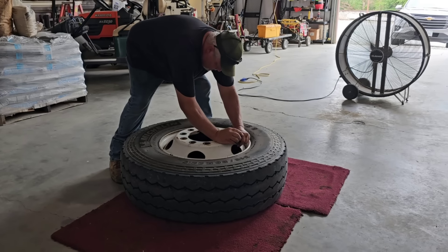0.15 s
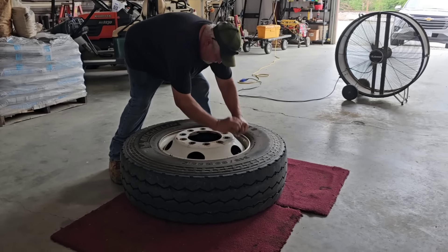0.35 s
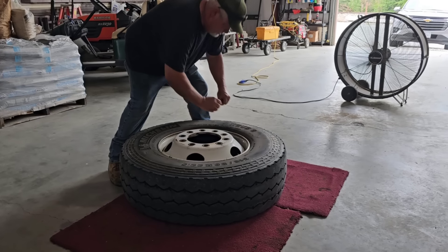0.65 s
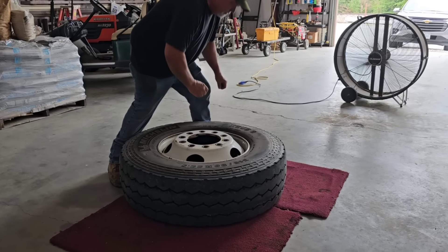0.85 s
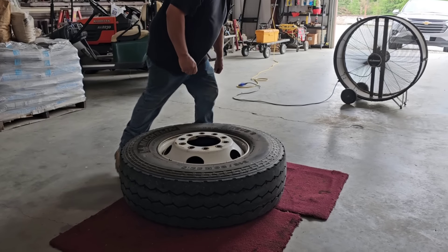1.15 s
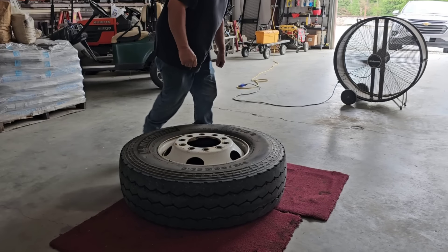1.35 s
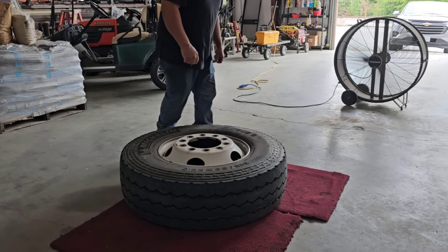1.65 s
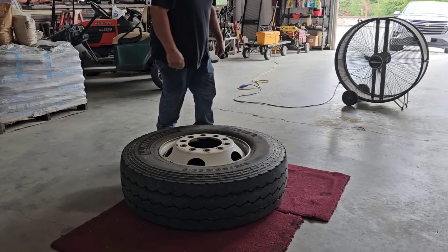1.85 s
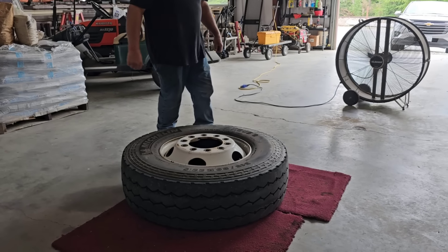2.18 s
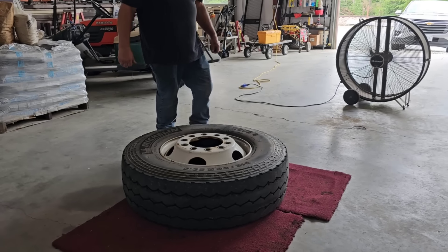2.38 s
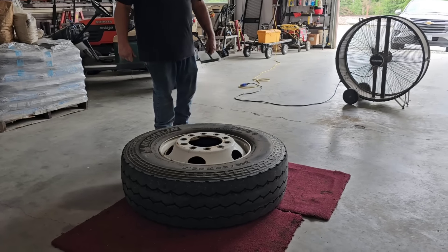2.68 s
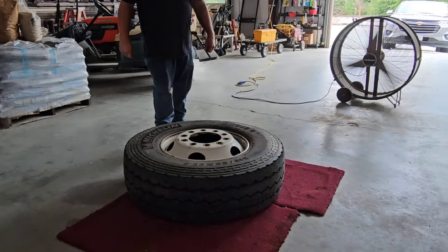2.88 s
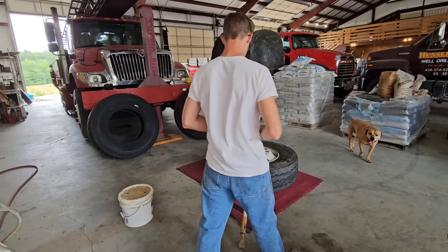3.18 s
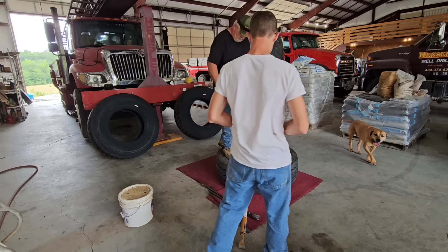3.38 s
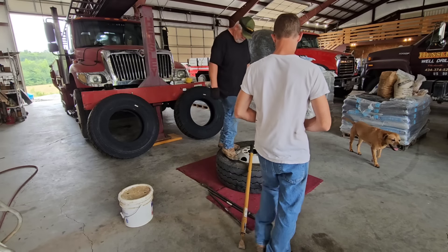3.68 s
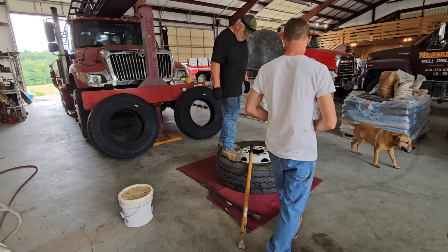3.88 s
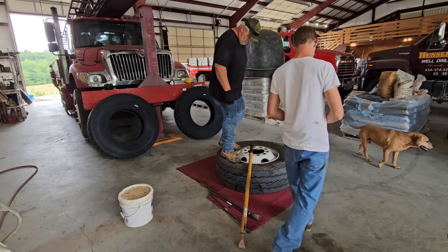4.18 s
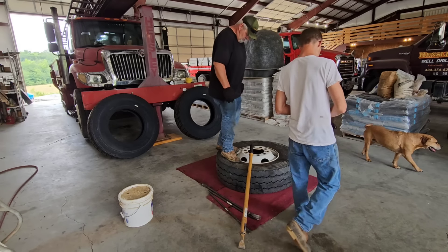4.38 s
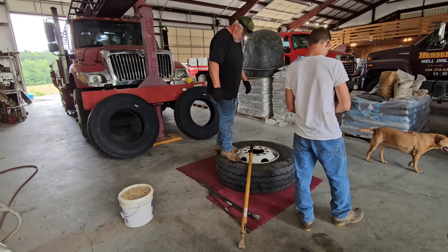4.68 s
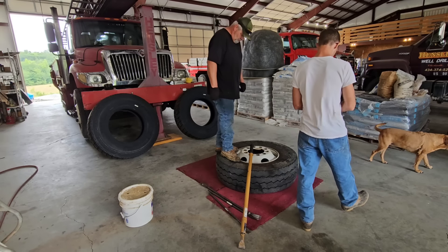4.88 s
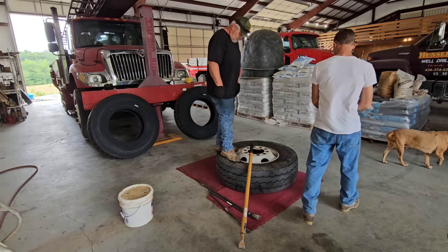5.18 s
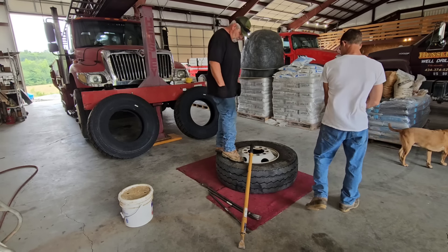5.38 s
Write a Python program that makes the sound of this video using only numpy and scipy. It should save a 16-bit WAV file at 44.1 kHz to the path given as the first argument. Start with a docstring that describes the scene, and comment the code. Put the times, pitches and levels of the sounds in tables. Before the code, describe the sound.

Close stereo pickup beside a deflating truck tyre: sharp, wide, high hissing, initially turbulent and hollow around hands, then clear and growing louder. Low fan drone and soft boot thuds sit underneath. Halfway, the view jumps across the workshop with no hiss, just a fuller low fan roar, sparse footsteps and tiny clicks, perhaps dog claws on concrete.

```python
"""Tyre deflating in a shed

Air jets from a truck tyre valve, at first against hands: shaped noise with narrow peaks and a hollow ring.
A large drum fan drones throughout: roar noise, blade tones and a hum; boots thump as decaying sines.
At three seconds the scene jumps to a later moment across the shed: the tyre is empty, leaving the fan,
steps and faint noise ticks."""
import sys
import numpy as np
from scipy import signal
from scipy.fft import rfft, irfft, next_fast_len
from scipy.io import wavfile
from scipy.ndimage import map_coordinates

SR = 44100
rng = np.random.default_rng(int(sys.argv[2]) if len(sys.argv) > 2 else 0)


def wav_record(signal):
    """Record a signal, one row per channel, as 16-bit PCM in the file named by sys.argv[1]."""
    frames = np.transpose(np.atleast_2d(signal))
    bounded = np.clip(frames, -1, 1)
    # unit amplitude maps onto the largest positive 16-bit level
    quanta = np.round(bounded * 32767).astype(np.int16)
    wavfile.write(sys.argv[1], SR, quanta)


N = 244266

# Spectrum of the valve jet. Each row: frequency in Hz, relative density in dB per Hz.
JET_COLOUR = [(250, -51), (450, -27), (900, -17.5), (1180, -17), (1500, -10.5), (1700, -14), (2150, -9.5),
              (2550, -9.5), (2850, -7.5), (3300, -3.5), (4500, 0), (5100, 0), (6250, -1), (6850, -2.5),
              (7200, -1.5), (7500, -1), (9800, -2.5), (10100, -9), (10900, -2.5), (11500, 1), (12500, -2),
              (14000, -0.5), (15600, -4.5)]
# Narrow wavering peaks in the hiss. Each row: frequency in Hz, width in Hz, mean level above the jet in dB.
JET_PEAKS = [(1890, 100, 3), (2185, 60, 4), (2860, 40, 3), (3050, 60, 3), (4520, 100, 3), (6041, 40, 3),
             (6505, 40, 4), (6971, 40, 2), (7204, 60, 5), (7510, 60, 3), (7750, 60, 3), (8200, 60, 3),
             (11500, 60, 3), (11714, 50, 4), (12165, 60, 3), (15270, 120, 3)]
# Jet across the channels. Each row: frequency in Hz, likeness 0-1, lead of the right in radians.
JET_STEREO = [(400, .85, 0), (900, .75, 0), (1250, .35, -1.0), (1700, .5, 0), (2050, .15, 1.5),
              (2700, .65, .4), (3600, .55, 0), (4300, .3, -1.2), (5200, .3, -2.3), (6200, .18, -1.2),
              (7500, .3, -1.0), (9000, .15, -2.0), (12500, .24, -1.5), (15500, .2, -.5)]
# Spectrum of air breaking on the hands. Each row: frequency in Hz, relative density in dB per Hz.
HANDS_COLOUR = [(40, -30), (90, -1), (150, 1), (300, -14), (600, -8.5), (915, -3), (1170, -9.5), (1500, -1),
                (1650, -11), (1840, -0.5), (2050, -3.5), (2440, -9), (2800, -6.5), (4500, 2.5),
                (5100, -1.5), (5800, -4), (7690, 1), (9300, -2), (10100, -29), (11500, 4.5), (13000, -3),
                (15600, 0.5)]
# Hands across the channels. Each row: frequency in Hz, likeness 0-1, lead of the right in radians.
HANDS_STEREO = [(60, .6, .1), (200, .8, .1), (460, .6, -.2), (650, .9, -.3), (900, .85, -.1),
                (1250, .55, -1.7), (1750, .65, -.3), (2430, .7, .2), (3400, .93, 0), (4700, .5, -1.8),
                (6500, .5, -1.5), (9100, .75, -2), (12700, .7, -1.6), (15500, .5, -1.5)]
# Narrow rings in the cupped hands. Each row: frequency in Hz, width in Hz, mean level above the hollow in dB.
CUP_PEAKS = [(2650, 35, 8), (3020, 90, 2.5)]
# Fan roar by the tyre, then across the shed. Each row: frequency in Hz, relative density in dB per Hz.
ROAR_NEAR_COLOUR = [(12, -42), (20, -11), (75, -7), (119, -4), (199, -3.5), (240, -5), (261, -5),
                    (290, -6.5), (408, -21.5), (546, -17.5), (730, -22), (912, -19.5), (1200, -29.5),
                    (1560, -56), (2640, -120)]
ROAR_FAR_COLOUR = [(12, -45), (20, -24), (60, -6), (127, -3), (193, -7), (300, -3), (422, -7.5),
                   (700, -12.5), (1000, -18), (1150, -18), (1400, -19), (1750, -24.5), (2000, -23.5),
                   (2670, -26), (4500, -29.5), (6500, -33.5), (7700, -35.5), (8200, -35), (8700, -38.5),
                   (9800, -38.5), (10300, -42), (11500, -36), (13000, -39), (15600, -42)]
# Roar across the channels, near and far. Each row: frequency in Hz, likeness 0-1.
ROAR_NEAR_LIKENESS = [(30, .86), (65, .88), (120, .95), (240, .96), (330, .84), (460, .55), (650, .8),
                      (1200, .6)]
ROAR_FAR_LIKENESS = [(30, .985), (150, .97), (300, .94), (700, .72), (1200, .72), (1800, .35), (2300, .45),
                     (3000, .15), (15000, .15)]
# Fan blade tones. Each row: multiple of the blade rate, base level near in dB, base level far in dB,
# left minus right near in dB, left minus right far in dB.
BLADES = [(1, -66, -50.5, 0, 0), (2, -61, -47, 2, 0), (3, -52, -43.5, 0, 0), (4, -40.5, -38.2, 0, 1),
          (5, -45.5, -38, 2, 0), (6, -42.7, -49.5, -3, -6), (7, -50.5, -43, 1, 0), (8, -38, -51, 0, 1.5),
          (9, -55.7, -42, 0, 0), (10, -56, -48.3, 0, 2), (11, -68, -49, 0, 1.5), (12, -64.5, -56, -2, 0)]
# Boots on mat and concrete. Each row: start in seconds, level before onset rounding in dB,
# frequency in Hz, 60 dB decay time in seconds.
STEPS = [(0.096, -25.5, 44.6, .15), (0.943, -25, 45, .18), (1.11, -23, 70, .1), (3.49, -26, 57, 0.43),
         (4.347, -22, 607, 0.037)]
# Faint ticks, perhaps claws on concrete. Each row: start in seconds, level before onset rounding in dB,
# brightness in dB per octave about 8 kHz.
TICKS = [(3.135, -56, 3), (3.6, -57, 2), (3.728, -49, 4), (3.925, -45, 2), (4.155, -58, 3), (4.32, -58, 3),
         (4.41, -49, 2), (4.72, -58, 3), (4.81, -57, 2), (4.98, -57, 3), (5.135, -55, 3), (5.195, -52, 2),
         (5.325, -58, 3), (5.4, -43.5, -6)]
# Spectrum of the ticks. Each row: frequency in Hz, relative density in dB per Hz.
TICK_COLOUR = [(2500, -30), (3600, -8), (4500, 0), (6000, -6), (8200, -2), (10200, -8), (12500, 0),
               (15600, -7)]
# Housing colour of the two channels. Each row: frequency in Hz, left minus right in dB.
PORT_BALANCE = [(500, 0), (1000, 1.5), (1800, 0.5), (2700, 0), (4000, -0.5), (4800, -1), (5500, 2),
                (6300, 4), (7300, 8), (8200, 10.5), (9800, 1), (10200, 3), (11400, 0.5), (12200, 3.5),
                (13500, 0), (14500, 1), (15600, 10)]

T = np.arange(N) / SR
SIZE = next_fast_len(N)
HZ = np.maximum(np.arange(SIZE // 2 + 1) * SR / SIZE, 1)

# jet: the free level grows as the man steps out of its way; falling pressure dulls it
JET_LOW_DB, JET_FULL_DB, JET_RISE_FROM_S, JET_RISE_S = -19.5, -15, 0.61, 0.74
JET_TILT_DB_PER_OCT, JET_DULLING_DB_PER_OCT_PER_S = 1.13, .3
PEAK_WAVER_DB, PEAK_WAVER_HZ = 4, 9
RIPPLE_DB, RIPPLE_WIDTH_HZ = 1.5, 14
# hands: they make the jet louder and duller; before they close it is thin and sinking
HANDS_IN_S, HANDS_ATTACK_S, HANDS_OUT_S, HANDS_RELEASE_S = 0.063, 0.11, 0.33, 0.074
COVERED_BOOST_DB, COVERED_TILT_DB_PER_OCT = 2.5, -0.7
THIN_BOOST_DB, THIN_FALL_DB_PER_S, THIN_TILT_DB_PER_OCT = 4.5, 24, 2.5
# rush on the hands: dull as they graze the jet, bright when they cover it
RUSH_BEFORE_DB, RUSH_PEAK_DB, RUSH_LAST_DB = -20.5, -11.5, -17
RUSH_ATTACK_S, RUSH_HOLD_S, RUSH_LINGERS_S, RUSH_FALL_DB_PER_S = 0.023, 0.045, 0.054, 200
RUSH_DULL_DB_PER_OCT, RUSH_BRIGHT_DB_PER_OCT, RUSH_BRIGHTEST_S = -0.5, 1.5, 0.14
# hollow between the palms
CUP_HZ, CUP_WIDTH_HZ = 3540, 1800
CUP_FROM_S, CUP_SWELL_S, CUP_DB, CUP_FALL_DB_PER_S = 0.088, 0.072, -21.5, 29
CUP_SINK_DB_PER_OCT_PER_S = 28
# fan by the tyre: louder at first, then settling
BLADE_NEAR_HZ, BLADE_PASS_NEAR_S, BLADE_LEAD_NEAR_S = 30.453, -.0034, .0001
ROAR_NEAR_DB, ROAR_NEAR_RISE_DB_PER_S, TONES_NEAR_RISE_DB_PER_S = -37, 0.77, 0.18
FAN_START_DB, FAN_SETTLE_S = 7.5, 0.097
HUM_HZ, HUM_NEAR_DB, HUM_FAR_DB = 42.6, -51, -46
PHASE_SCATTER_RAD = 1.0
# fan across the shed: arrives first at the right channel
BLADE_FAR_HZ, BLADE_PASS_FAR_S, RIGHT_LEAD_S = 30.37, .0022, 0.00042
ROAR_FAR_DB, BLADE_THROB_DB, THROB_TOP_HZ = -30, 1, 1200
TONES_FAR_FALL_DB_PER_S, TONES_FAR_REFERENCE_S, TONE_SLIP_FAR_RAD = 1, 5.9, .35
STEP_ATTACK_CYCLES = 0.27
TICK_ATTACK_S, TICK_T60_S, TICK_LIKENESS = .006, 0.3, .3
PATCH_NEAR_DB, PATCH_FAR_DB, PATCH_WIDTH_HZ, PATCH_S = 2.0, 1.2, 110, .05
JUMP_S, FADE_OUT_S, FADE_IN_S = 2.9922, .002, .005
CUTOFF_HZ = 15470


def from_db(db):
    """Decibels to gain."""
    return 10 ** (np.asarray(db) / 20)


def in_hz(rows):
    """Columns of a spectral table at every FFT bin, straight on a log axis."""
    hz, *columns = np.transpose(rows)
    return [np.interp(np.log(HZ), np.log(hz), column) for column in columns]


def ramp(start_s, length_s):
    """Rises straight from 0 to 1."""
    return np.clip((T - start_s) / length_s, 0, 1)


def drift(rate_hz):
    """Slow random curve of spread 1: coarse noise through a double one-pole low-pass."""
    pole = np.exp(-80 * np.pi * rate_hz / SR)  # computed at every 40th sample
    noise = rng.standard_normal(N // 40 + 2002)
    slow = signal.lfilter([1], [1, -2 * pole, pole * pole], noise)[2000:]
    return np.interp(np.arange(N) / 40, np.arange(len(slow)), slow / slow.std())


def ripple():
    """Reflections from wheel, floor and walls as random fine ups and downs along frequency, in dB."""
    knots_hz = np.arange(0, SR / 2, RIPPLE_WIDTH_HZ)
    return RIPPLE_DB * np.interp(HZ, knots_hz, rng.standard_normal(SR)[:len(knots_hz)])


def turbulence(colour_db, alike, lead_rad, gust_db, flicker_db, tilt_db=0, pivot_hz=6000, peaks=()):
    """Stereo noise, rms 1 before modulation: shared gusts, flicker per octave band, wavering narrow peaks."""
    common, own = rfft(rng.standard_normal((2, SIZE)))
    alike = np.clip(alike, 0, 1)
    right = (alike * common + np.sqrt(1 - alike ** 2) * own) * np.exp(1j * lead_rad)
    pair = from_db(colour_db) * np.array([common, right])
    pair = pair * SIZE / np.sqrt(np.sum(np.abs(pair) ** 2))
    out, gust = 0, gust_db * (drift(9.7) + drift(31))
    for centre_hz in 31.25 * 2. ** np.arange(10):
        octaves = np.log2(np.clip(HZ, 31.25, 16000) / centre_hz)
        share = np.cos(np.pi / 2 * np.clip(octaves, -1, 1)) ** 2  # overlapping bands sum to 1
        gain = from_db(gust + flicker_db * drift(19.6) + tilt_db * np.log2(centre_hz / pivot_hz))
        out = out + gain * irfft(pair * share, SIZE)[:, :N]
    for hz, width_hz, db in peaks:
        extra = (from_db(db) - 1) / (1 + (2 * (HZ - hz) / width_hz) ** 2)
        waver = PEAK_WAVER_DB * drift(PEAK_WAVER_HZ)
        gain = from_db(gust + waver + tilt_db * np.log2(hz / pivot_hz))
        out = out + gain * irfft(pair * extra, SIZE)[:, :N]
    return out


def patchy(x, depth_db):
    """Narrow stretches of hiss swell and sink at random, alike in both channels."""
    hz, s, cells = signal.stft(x, SR, nperseg=1024)
    grid = rng.standard_normal((int(hz[-1] / PATCH_WIDTH_HZ) + 2, int(s[-1] / PATCH_S) + 2))
    where = np.meshgrid(hz / PATCH_WIDTH_HZ, s / PATCH_S, indexing="ij")
    field = map_coordinates(grid, where, order=3)
    gain = from_db(depth_db * field * (hz[:, None] > 500))  # bass stays steady
    gain = gain / np.sqrt(np.mean(gain ** 2))
    return signal.istft(cells * gain, SR, nperseg=1024)[1][:, :N]


def jet():
    """Bright mixing noise of the valve jet, with narrow wavering peaks standing a little out of it."""
    closing = ramp(HANDS_IN_S, HANDS_ATTACK_S)
    covered = closing - ramp(HANDS_OUT_S, HANDS_RELEASE_S)
    thin = 1 - closing
    unrisen = np.exp(-np.maximum(T - JET_RISE_FROM_S, 0) / JET_RISE_S)
    free_db = JET_FULL_DB + (JET_LOW_DB - JET_FULL_DB) * unrisen
    level_db = free_db + COVERED_BOOST_DB * covered + (THIN_BOOST_DB - THIN_FALL_DB_PER_S * T) * thin
    tilt_db = JET_TILT_DB_PER_OCT + COVERED_TILT_DB_PER_OCT * covered + THIN_TILT_DB_PER_OCT * thin
    tilt_db = tilt_db - JET_DULLING_DB_PER_OCT_PER_S * (T - 1)
    colour_db = in_hz(JET_COLOUR)[0] + ripple()
    hiss = turbulence(colour_db, *in_hz(JET_STEREO), gust_db=0.05, flicker_db=0.3,
                      tilt_db=tilt_db, peaks=JET_PEAKS)
    return from_db(level_db) * hiss


def hands():
    """Air breaking on the hands: a rush that peaks as they close in, sags, and dies as they pull away."""
    arrived_s, left_s = HANDS_IN_S + RUSH_ATTACK_S, HANDS_OUT_S + RUSH_LINGERS_S
    level_db = np.interp(T, [HANDS_IN_S, arrived_s, arrived_s + RUSH_HOLD_S, left_s],
                         [RUSH_BEFORE_DB, RUSH_PEAK_DB, RUSH_PEAK_DB, RUSH_LAST_DB])
    level_db = level_db - RUSH_FALL_DB_PER_S * np.maximum(T - left_s, 0)
    tilt_db = np.interp(T, [arrived_s, RUSH_BRIGHTEST_S, left_s],
                        [RUSH_DULL_DB_PER_OCT, RUSH_BRIGHT_DB_PER_OCT, RUSH_DULL_DB_PER_OCT])
    colour_db = in_hz(HANDS_COLOUR)[0] + ripple()
    rush = turbulence(colour_db, *in_hz(HANDS_STEREO), gust_db=.6, flicker_db=.9,
                      tilt_db=tilt_db, pivot_hz=3500)
    return from_db(level_db) * rush


def tone(hz, db, balance_db, lead_s, waver_db, crest_s=0, slip_rad=0):
    """A tone whose level wavers, and whose phase may slip, with the air it travels through."""
    side = np.array([[-.5], [.5]])
    phase = 2 * np.pi * hz * (T - crest_s + side * lead_s)
    phase = phase + PHASE_SCATTER_RAD * rng.standard_normal() + slip_rad * drift(5.8)
    level_db = db + waver_db * drift(3.1) - side * balance_db
    return np.sqrt(2) * from_db(level_db) * np.cos(phase)


def fan_near():
    """Roar, blade-rate harmonics and a separate low hum beside the tyre."""
    roar = turbulence(*in_hz(ROAR_NEAR_COLOUR), *in_hz(ROAR_NEAR_LIKENESS), 0.1,
                      gust_db=0.4, flicker_db=-1.5)  # the sign of a random depth is immaterial
    tones = sum(tone(k * BLADE_NEAR_HZ, db, balance_db, BLADE_LEAD_NEAR_S, waver_db=.6,
                     crest_s=BLADE_PASS_NEAR_S)
                for k, db, _, balance_db, _ in BLADES)
    hum = tone(HUM_HZ, HUM_NEAR_DB, 0, 0, waver_db=.8)
    roar = from_db(ROAR_NEAR_DB + ROAR_NEAR_RISE_DB_PER_S * T) * roar
    tones = from_db(TONES_NEAR_RISE_DB_PER_S * T) * tones
    settling = from_db(FAN_START_DB * np.exp(-T / FAN_SETTLE_S))
    return settling * (roar + tones + hum)


def cup():
    """Air resonating between the palms: swells once they close, darkens and fades as they loosen."""
    colour_db = -20 * np.log10(1 + (2 * (HZ - CUP_HZ) / CUP_WIDTH_HZ) ** 4)
    since_swell_s = T - CUP_FROM_S - CUP_SWELL_S
    level = ramp(CUP_FROM_S, CUP_SWELL_S) * (1 - ramp(HANDS_OUT_S, HANDS_RELEASE_S))
    level = level * from_db(CUP_DB - CUP_FALL_DB_PER_S * np.maximum(since_swell_s, 0))
    tilt_db = -CUP_SINK_DB_PER_OCT_PER_S * np.clip(since_swell_s, -1, .3)
    ring = turbulence(colour_db, *in_hz(HANDS_STEREO), gust_db=.8, flicker_db=.8,
                      tilt_db=tilt_db, pivot_hz=CUP_HZ, peaks=CUP_PEAKS)
    return level * ring


def steps():
    """Each boot pushes the floor: a decaying sine with a soft onset, low but for the last short tap."""
    out = np.zeros(N)
    for start_s, db, hz, t60_s in STEPS:
        age_s = np.maximum(T - start_s, 0)
        onset = 1 - np.exp(-age_s * hz / STEP_ATTACK_CYCLES)
        out -= from_db(db - 60 * age_s / t60_s) * onset * np.sin(2 * np.pi * hz * age_s)
    return out


def fan_far():
    """The fan across the shed: other tones stand out, passing blades swell the lower roar."""
    lead_rad = 2 * np.pi * HZ * RIGHT_LEAD_S
    roar = turbulence(*in_hz(ROAR_FAR_COLOUR), *in_hz(ROAR_FAR_LIKENESS), lead_rad,
                      gust_db=0.35, flicker_db=0.45)
    low = irfft(rfft(roar, SIZE) / (1 + (HZ / THROB_TOP_HZ) ** 4), SIZE)[:, :N]
    throb_db = BLADE_THROB_DB * np.cos(2 * np.pi * BLADE_FAR_HZ * (T - BLADE_PASS_FAR_S))
    roar = roar + low * (from_db(throb_db) - 1)
    tones = sum(tone(k * BLADE_FAR_HZ, db, balance_db, RIGHT_LEAD_S, waver_db=2.5,
                     crest_s=BLADE_PASS_FAR_S, slip_rad=TONE_SLIP_FAR_RAD)
                for k, _, db, _, balance_db in BLADES)
    tones = from_db(TONES_FAR_FALL_DB_PER_S * (TONES_FAR_REFERENCE_S - T)) * tones
    hum = tone(HUM_HZ, HUM_FAR_DB, 0, 0, waver_db=.8)
    return from_db(ROAR_FAR_DB) * roar + tones + hum


def ticks():
    """Short noise bursts, quick to rise and dying in the shed."""
    start_s, db, bright_db = np.transpose(TICKS)
    age_s = np.maximum(T - start_s[:, None], 0)
    onset = 1 - np.exp(-age_s / TICK_ATTACK_S)
    shapes = from_db(db[:, None] - 60 * age_s / TICK_T60_S) * onset
    tilt_db = bright_db[np.argmax(shapes, axis=0)]  # the loudest tick sets the brightness
    noise = turbulence(*in_hz(TICK_COLOUR), TICK_LIKENESS, 0, gust_db=0, flicker_db=0,
                       tilt_db=tilt_db, pivot_hz=8000)
    return shapes.sum(axis=0) * noise


def scene():
    """The first standpoint fades out within milliseconds and the second one fades in."""
    since_s = np.maximum(T - JUMP_S, 0)
    near = patchy(jet() + hands() + cup(), PATCH_NEAR_DB) + fan_near()
    near = np.exp(-since_s / FADE_OUT_S) * near
    far = (1 - np.exp(-since_s / FADE_IN_S)) * patchy(fan_far(), PATCH_FAR_DB)
    return near + far + steps() + ticks()


def record(dry):
    """Each channel has its own colour; peaks are rounded, the top is cut."""
    balance_db, = in_hz(PORT_BALANCE)
    colour = from_db(np.array([[.5], [-.5]]) * balance_db)
    ports = irfft(rfft(dry, SIZE) * colour, SIZE)[:, :N]
    rounded = 1.504 * np.tanh(ports / 1.51)
    top_cut = signal.ellip(14, .5, 70, CUTOFF_HZ, fs=SR, output="sos")
    return signal.sosfilt(top_cut, rounded)


dry = scene()
out = record(dry)
wav_record(out)
```